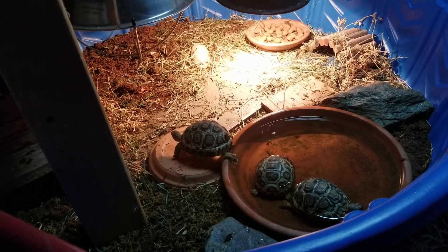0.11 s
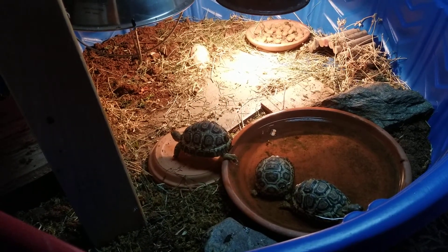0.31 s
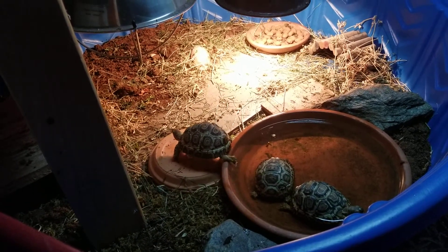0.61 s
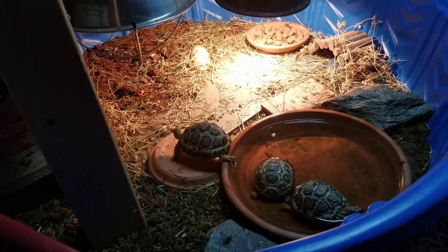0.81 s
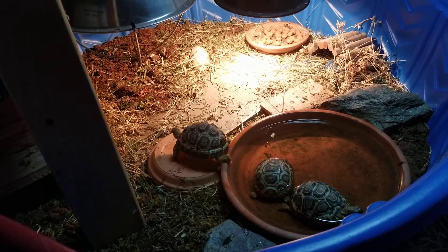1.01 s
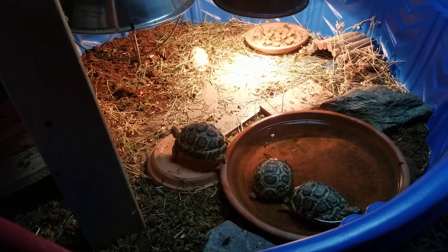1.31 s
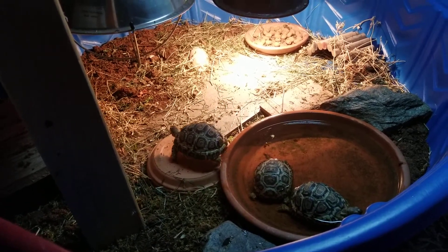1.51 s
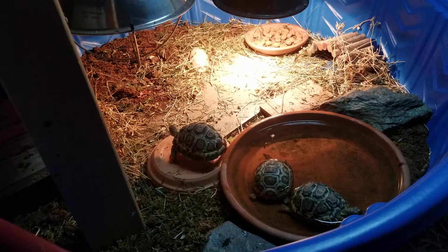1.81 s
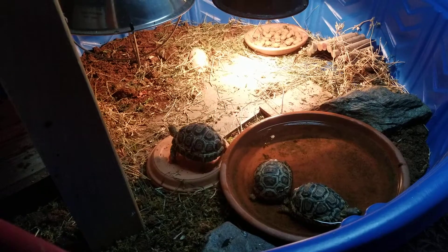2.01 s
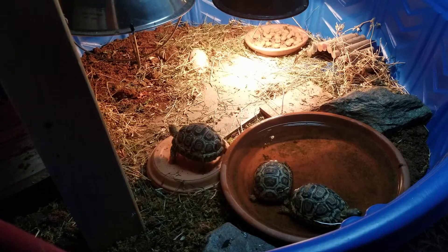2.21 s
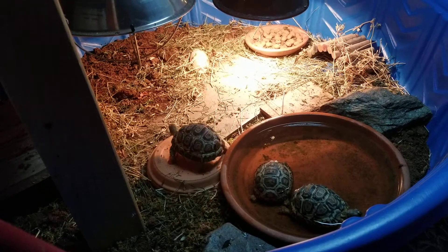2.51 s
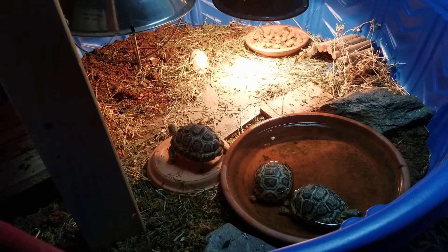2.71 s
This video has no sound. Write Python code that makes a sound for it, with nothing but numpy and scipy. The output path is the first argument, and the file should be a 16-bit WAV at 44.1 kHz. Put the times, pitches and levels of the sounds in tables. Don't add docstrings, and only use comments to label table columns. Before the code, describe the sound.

Hollow shell knocks thump a thin tub floor, with a dish cracking down and booming midway

```python
import sys
import numpy as np
from scipy import signal
from scipy.fft import rfft, irfft, next_fast_len
from scipy.io import wavfile
from scipy.ndimage import uniform_filter1d

SR = 44100
rng = np.random.default_rng(int(sys.argv[2]) if len(sys.argv) > 2 else 0)


def generate_wav(signal):
    frames = np.transpose(np.atleast_2d(signal))
    scaled = np.clip(frames, -1, 1) * 32767
    pcm = np.round(scaled).astype(np.int16)
    wavfile.write(sys.argv[1], SR, pcm)


def ratio(d):
    e = np.asarray(d, float) / 20
    return 10 ** e


N = 125685

# (time [s], thump peak [dB], thump pitch [Hz], ring re thump [dB], contact corner [Hz])
KNOCKS = [
    (0.2351, -8, 143, -13, 2060),
    (1.0292, -11, 143.7, -19.5, 1534),
    (1.6036, -14.5, 151, -14, 897),
    (2.3076, -22.5, 151.2, -17, 587),
    (2.5559, -22.5, 150, -18, 602),
    (2.7482, -26, 159, -16.5, 483),
]
# (frequency [Hz], level per Hz [dB])
RING = [(50, -15.5), (100, -2), (170, -7.5), (280, -1), (409, -14), (560, -9.5), (1500, -16.5), (4000, -45)]
# (frequency [Hz], t60 [s])
RING_T60 = [(60, 0.56), (120, 0.36), (500, 0.33), (2000, 0.34), (8000, 0.28)]
# (frequency [Hz], level re thump [dB], t60 [s], start
# delay [s])
KNOCK_MODES = [(109.95, -17.5, 0.24, 0.027), (177.5, -26.5, 0.38, 0.038), (260.7, -16, .09, .015),
               (526.4, -24, 0.27, .028), (549.2, -27, 0.34, 0.013), (800, -34, .3, 0.012),
               (1260, -39, .3, 0.059), (2127, -41.5, 0.54, 0.034), (2790, -49, .55, 0.032)]
# (frequency [Hz], level per Hz [dB])
CRACK = [(410, -21), (700, 4.5), (957, -17), (1400, -3.5), (3300, -18), (3970, -15), (6510, -17.5),
         (8450, -37), (15800, -28.5)]
# (frequency [Hz], level per Hz [dB])
BOOM = [(47, -30.5), (80, -7.5), (115, 2.5), (170, -3.5), (275, -11), (453, -17.5), (800, -24), (1200, -30)]
# (frequency [Hz], level [dB], time [s], rise [s], t60 [s])
FLOOR_MODES = [(61.3, -21, 1.715, 0.043, 0.56), (121, -33, 1.69, 0.047, 0.61),
               (160.4, -33, 1.72, 0.083, 0.96), (149, -35.5, 2.1, 0.017, 0.17)]
# (time [s], peak [dB], contact [s])
BUMPS = [
    (1.995, -23, 0.0025),
    (2.013, -23, 0.0013),
]
# (frequency [Hz], level [dB], t60 [s], start delay [s])
CLAY_NOTES = [(592.6, -36, 0.17, 0.0035), (535, -41, 0.28, .03)]
# (frequency [Hz], level per Hz [dB])
BUMP_RING = [(50, -16), (140, -7.5), (203, -2), (311, -3.5), (430, -12), (560, -8.5), (750, -17.5),
             (1300, -30.5), (4000, -63)]
# (time [s], level [dB], centre [Hz], width [octaves])
SCUFFS = [
    (0.236, -71.5, 4620, 0.5),
    (1.03, -51, 1320, 0.48),
    (1.036, -69, 2630, 0.51),
    (.695, -72, 1990, 0.615),
    (1.615, -39.5, 535, .12),
    (2.0, -68, 1210, 0.26),
    (2.558, -67.5, 1300, 0.39),
]
# (time [s], level [dB], rise [s], t60 [s])
RUSTLES = [(0.0, -71, 0.0033, 1), (0.101, -71.5, 0.028, 0.77), (0.539, -78.5, 0.081, 0.93),
           (0.699, -67.5, 0.01, 0.65), (1.26, -77.5, 0.016, .4), (2.119, -74.5, 0.039, 0.32),
           (2.498, -85.5, 0.068, .8)]
# (frequency [Hz], level per Hz [dB])
RUSTLE = [(530, -38), (900, -16.5), (1130, -20), (1310, -13), (2810, -9.5), (3530, -20), (6130, -6.5),
          (8370, -33), (15800, -11.5)]
# (time [s], level [dB])
RUMBLE_LEVEL = [(0, -55.5), (.18, -51), (.21, -56.5), (.3, -52), (.65, -52), (1.0, -58), (1.3, -55.5),
                (1.52, -58), (1.56, -65.5), (1.62, -50.5), (2.25, -55.5), (2.85, -58)]
# (frequency [Hz], level per Hz [dB])
RUMBLE = [(12, -42), (20, -13), (72, -3), (131, -9), (172, -24), (265, -20), (373, -35.5), (1500, -44),
          (1950, -67), (3300, -120)]
# (frequency [Hz], level per Hz [dB])
HISS = [(880, -44), (1500, 6), (1640, -14), (2100, 6), (2960, -3), (5090, 3), (8660, -14), (11200, -1.5),
        (15800, 3.5)]
# (frequency [Hz], correlation [0-1])
LIKENESS = [(60, .999), (250, 0.87), (500, 0.86), (1000, 0.17), (2000, 0.12), (12000, 0.041)]
# (frequency [Hz], phase lag [radians])
PORT_LAG = [(0, -1), (150, 0.11), (600, 0.05), (860, 1.05), (1460, 3), (15500, 34.5)]
BANDS = 25 * 2 ** (np.arange(29) / 3)

THUMP_S, THUMP_LEAD_S, OVERTONE_DB = 0.02, 0.00024, -18
RING_RISE_S, BASS_RISE_S, OWN_SHARE, CONTACT_DB_OCT = 0.027, 0.05, 0.35, 30
DIRECT_DB, DIRECT_T60_S = -6.5, 0.05
CRACK_S, CRACK_DB, CRACK_RISE_S = 1.666, -40, 0.018
TICK_DB, TICK_T60_S = -38, 0.025
BOOM_S, BOOM_DB, BOOM_RISE_S, BOOM_T60_S = 1.68, -29.5, 0.06, 0.56
BUMP_DB, BUMP_RISE_S, BUMP_T60_S = -34, 0.027, 0.34
SCUFF_RISE_S, SCUFF_T60_S = 0.028, 0.3
HISS_DB, FLICKER_DB = -78.5, 2.5
LEFT_DB, LEFT_BRIGHT_DB, FLOOR_LEFT_DB = 3.9, 7.5, 2.5
BASS_CUT_HZ, TOP_HZ = 37, 15750


def table(rows, hz):
    rows = np.array(rows, float)
    return np.interp(np.log(hz), np.log(rows[:, 0]), rows[:, 1])


def bands(size):
    f = np.arange(size // 2 + 1) * SR / size + 1
    a, b = rfft(rng.standard_normal((2, size)))
    likeness = np.clip(table(LIKENESS, f), -1, 1)
    pair = np.array([a, likeness * a + np.sqrt(1 - likeness ** 2) * b])
    octaves = np.log2(f / BANDS[:, None])
    share = np.cos(np.pi / 2 * np.clip(3 * octaves, -1, 1)) ** 2
    return irfft(share[:, None] * pair, size)


def unit_rms(gains):
    return gains / np.sqrt(np.sum(gains ** 2 * BANDS) * 0.35 / SR)


def weights(spectrum):
    rows = np.array(spectrum, float)
    below = np.maximum(np.log2(rows[0, 0] / BANDS), 0)
    above = np.maximum(np.log2(BANDS / rows[-1, 0]), 0)
    return unit_rms(ratio(table(rows, BANDS) - 24 * (below + above)))


def swell(t, rise_s, t60):
    rise = np.sin(np.pi / 2 * np.clip(t / rise_s, 0, 1)) ** 2
    return rise * ratio(-60 * np.clip(t - rise_s, 0, None) / t60)


def sine(hz, t):
    return np.sin(2 * np.pi * hz * t)


def add(out, x, at_s):
    i = max(int(at_s * SR), 0)
    out[:, i:i + x.shape[-1]] += x[..., :N - i]


def walk(rate, count):
    k = int(SR / rate)
    steps = np.repeat(rng.standard_normal((count, N // k + 1)), k, axis=1)
    return 1.3 * uniform_filter1d(uniform_filter1d(steps, k), k)[:, :N]


def ring(noise, gains, rise_s, t60, fresh=1):
    keep = gains > 3e-4 * gains.max()
    size = noise.shape[-1]
    rise_s, t60 = (np.broadcast_to(v, BANDS.shape)[keep, None] for v in (rise_s, t60))
    part = noise[keep]
    moved = np.roll(part, rng.integers(size), axis=2)
    part = np.sqrt(1 - fresh) * part + np.sqrt(fresh) * moved
    envelopes = gains[keep, None] * swell(np.arange(size) / SR, rise_s, t60)
    return np.einsum("bt,bct->ct", envelopes, part)


def knocks(out, t, noise):
    t60 = table(RING_T60, BANDS)
    rise_s = np.where(BANDS < 220, BASS_RISE_S, RING_RISE_S)
    for at, db, hz, ring_db, corner_hz in KNOCKS:
        def contact(f):
            return ratio(-CONTACT_DB_OCT * np.log2(1 + (f / corner_hz) ** 4) / 4)

        swing = sine(hz, t) + ratio(OVERTONE_DB) * np.cos(4 * np.pi * hz * t)
        thump = -np.sin(np.pi * np.clip(t / THUMP_S, 0, 1)) ** 1.2 * swing
        modes = sum(ratio(g) * contact(f) * swell(t - lag, lag, d) * sine(f, t) for f, g, d, lag in KNOCK_MODES)
        gains = weights(RING) * ratio(ring_db) * contact(BANDS)
        direct_gains = gains * ratio(DIRECT_DB) * (BANDS > 400)
        direct = ring(noise[..., :4096], direct_gains, 0.002, DIRECT_T60_S, fresh=0)
        add(out, ratio(db) * direct, at)
        tail = ring(noise, gains, rise_s, t60, fresh=OWN_SHARE)
        add(out, ratio(db) * (thump + modes + tail), at - THUMP_LEAD_S)


def dish_drop(out, low, t, noise):
    tail = ring(noise, weights(CRACK) * ratio(CRACK_DB), CRACK_RISE_S, 1.22 * table(RING_T60, BANDS))
    add(out, tail, CRACK_S)
    tick_gains = weights(CRACK) * ratio(TICK_DB) * (BANDS > 3500)
    add(out, ring(noise[..., -4096:], tick_gains, 0.00035, TICK_T60_S, fresh=0), CRACK_S)
    add(low, ring(noise, weights(BOOM) * ratio(BOOM_DB), BOOM_RISE_S, BOOM_T60_S), BOOM_S)
    for hz, db, at, rise_s, t60 in FLOOR_MODES:
        mode = ratio(db) * swell(t, rise_s, t60) * sine(hz, t)
        add(low, mode * np.ones((2, 1)), at)


def bumps(out, t, noise):
    for at, db, contact_s in BUMPS:
        u = (t - 2 * contact_s) / contact_s * 2
        push = -ratio(db) * (1 - u) * np.exp(-u ** 2)
        add(out, push * np.ones((2, 1)), at - 2 * contact_s)
    note = sum(ratio(db) * swell(t - lag, 0.0089, t60) * sine(hz, t) for hz, db, t60, lag in CLAY_NOTES)
    answer = ring(noise, weights(BUMP_RING) * ratio(BUMP_DB), BUMP_RISE_S, BUMP_T60_S)
    add(out, note + answer, BUMPS[0][0] - 0.004)


def scuffs(out, noise):
    for at, db, hz, octaves in SCUFFS:
        hump = np.exp(-(np.log2(BANDS / hz) / octaves) ** 2)
        add(out, ring(noise, unit_rms(hump) * ratio(db), SCUFF_RISE_S, SCUFF_T60_S), at)


def rustles(out, noise):
    for at, db, rise_s, t60 in RUSTLES:
        add(out, ring(noise, weights(RUSTLE) * ratio(db), rise_s, t60), at)


def background():
    level_db = np.interp(np.arange(N) / SR, *np.array(RUMBLE_LEVEL).T)
    moves = ratio(level_db + FLICKER_DB * walk(12, count=len(BANDS)))
    gains = weights(RUMBLE)[:, None] * moves + weights(HISS)[:, None] * ratio(HISS_DB)
    return np.einsum("bt,bct->ct", gains, bands(next_fast_len(N))[:, :, :N])


def lean(db):
    return ratio(np.array([[db], [-db]]) / 2)


def scene():
    t = np.arange(24576) / SR
    dull, bright = np.zeros((2, 2, N))
    noise = bands(len(t))
    knocks(dull, t, noise)
    dish_drop(bright, dull, t, noise)
    bumps(dull, t, noise)
    scuffs(bright, noise)
    rustles(bright, noise)
    left, right = dull * lean(LEFT_DB) + bright * lean(LEFT_BRIGHT_DB) + background() * lean(FLOOR_LEFT_DB)
    size = next_fast_len(N + 4096)
    lag = np.interp(np.arange(size // 2 + 1) * SR / size, *np.array(PORT_LAG).T)
    late_right = irfft(rfft(right, size) * np.exp(-1j * lag), size)[:N]
    return np.array([left, late_right])


def low_pass(x):
    return signal.sosfilt(signal.butter(12, 15970, fs=SR, output="sos"), x)


def record(dry):
    bass_cut = signal.butter(2, BASS_CUT_HZ, "high", fs=SR, output="sos")
    top_cut = signal.ellip(8, 0.2, 70, TOP_HZ, fs=SR, output="sos")
    mix = signal.sosfilt(top_cut, signal.sosfilt(bass_cut, dry))
    return low_pass(mix)


dry = scene()
out = record(dry)
generate_wav(out)
```